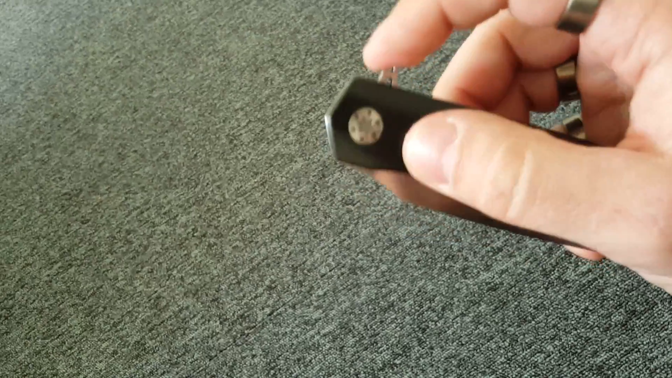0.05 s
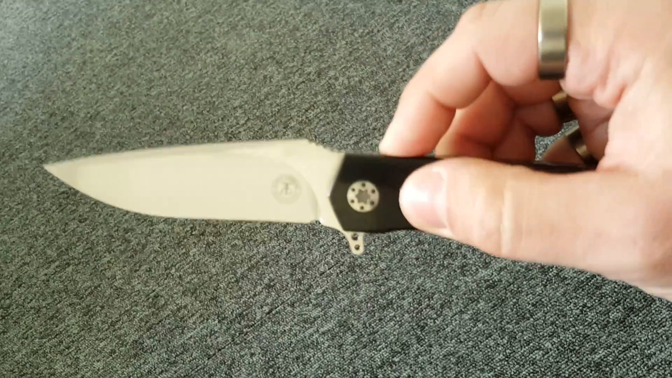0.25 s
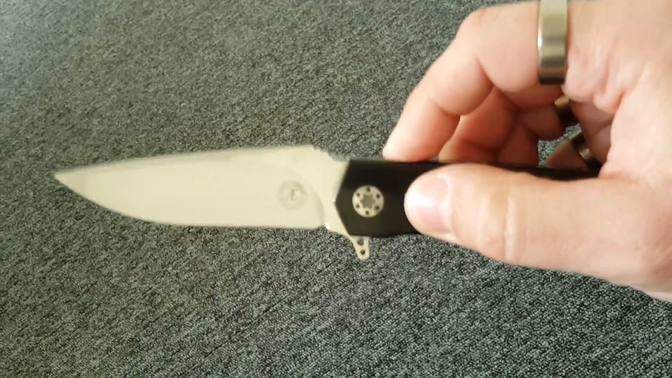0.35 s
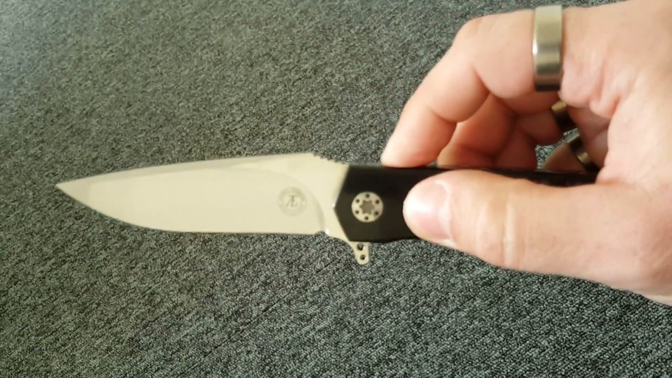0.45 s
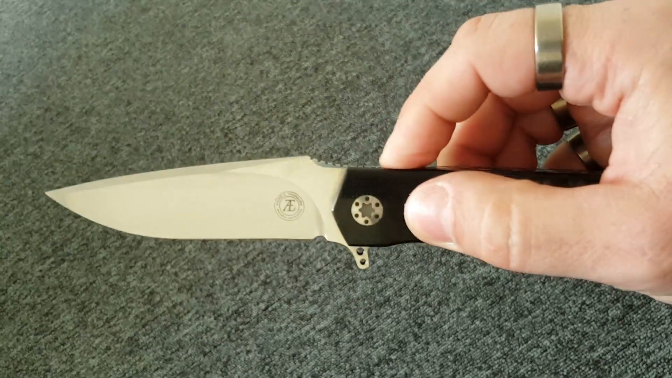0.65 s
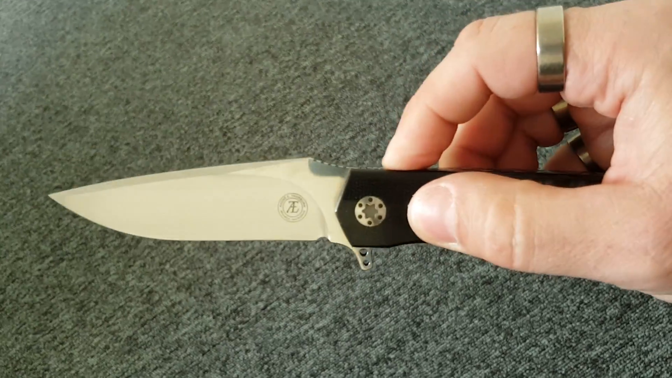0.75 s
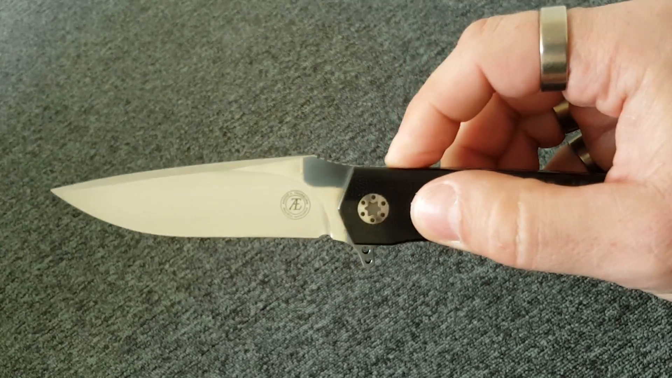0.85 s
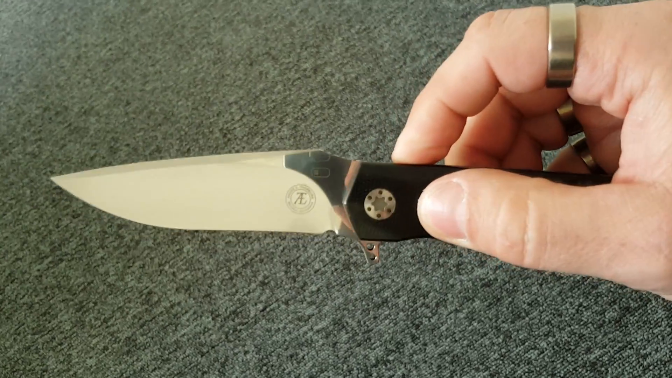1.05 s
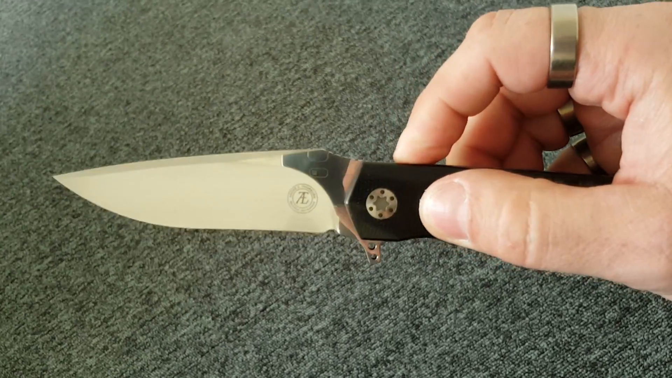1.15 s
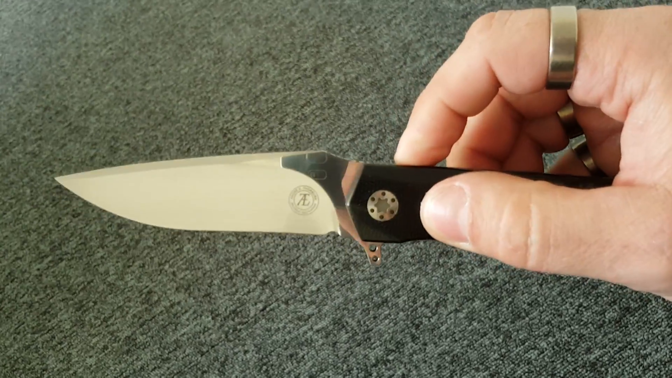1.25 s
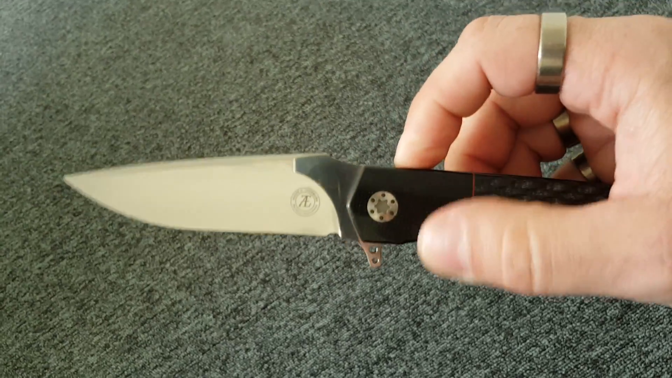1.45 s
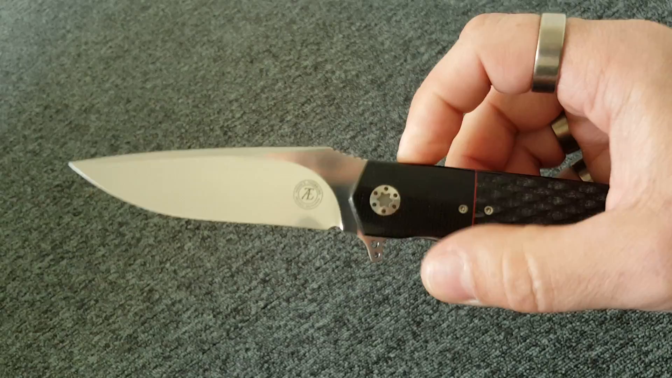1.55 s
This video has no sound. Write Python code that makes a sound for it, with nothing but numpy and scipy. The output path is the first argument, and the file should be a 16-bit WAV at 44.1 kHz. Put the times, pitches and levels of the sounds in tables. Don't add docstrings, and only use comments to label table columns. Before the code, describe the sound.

Close stereo sound of a pocket knife opening: a brief faint metal grate leads at once into a crisp, loud locking clack, quickly damped by the hand, then only soft low room hum and slight hiss.

```python
import sys
import numpy as np
from scipy import signal
from scipy.fft import rfft, irfft, next_fast_len
from scipy.io import wavfile

SR = 44100
rng = np.random.default_rng(int(sys.argv[2]) if len(sys.argv) > 2 else 0)


def wrap_up_sound(samples):
    columns = np.atleast_2d(samples).T
    tamed = np.clip(columns, -1, 1)
    steps = np.round(tamed * 32767).astype(np.int16)
    wavfile.write(sys.argv[1], SR, steps)


def convert_level_to_amplitude(level_db):
    exponent = np.asarray(level_db, float) / 20
    return 10 ** exponent


N = 70560


def snap():
    # start_s, level_db, tilt_db_per_octave
    contacts = [(.1338, -51, -1), (.1537, -45.5, -7), (.1567, -40, -2), (.2042, -16, -1), (.2067, -30, -5),
                (.2095, -34.5, 4.5), (.2111, -5, 5.5), (.2122, -6.5, 1.5), (.2134, -6, 0.5),
                (.2146, -14.5, -0.5), (1.394, -69.5, 0), (1.461, -61.5, -3.0)]
    # pitch_hz, level_db, t60_s, left_right_db
    handle_modes = [(650, -30, 0.011, 11), (1113, -31, 0.057, 3.5), (1840, -18.5, 0.0073, -4.5),
                    (2740, -10, 0.0072, 7.2), (3255, 2.5, 0.013, 0.8), (3680, -2.5, 0.015, 4.45),
                    (4072, -5, 0.016, -4.5), (4760, 1.35, 0.013, -5), (5580, -6.5, .012, -1.4),
                    (6380, -17, 0.0086, 2.5), (9654, -16.5, 0.0095, 2), (11630, -26.5, 0.0041, 4.4),
                    (13034, -22.5, 0.015, 6.8), (15630, -22.5, .01, -8.5)]
    # pitch_hz, level_db, t60_s, left_right_db
    blade_modes = [(4605, -25, .12, 7.9), (6877, -16, 0.049, -1), (8470, -24, .15, -2.5),
                   (12346, -36, .08, -1)]
    spread_db = 5.5
    start_s, level_db, tilt_db = np.transpose(contacts)
    at = (start_s * SR).astype(int)
    part = start_s * SR % 1

    def strike(hz):
        chance_db = spread_db * rng.standard_normal(len(at))
        size = convert_level_to_amplitude(level_db + tilt_db * np.log2(hz / 4000) + chance_db)
        clicks = np.zeros(N)
        clicks[at], clicks[at + 1] = size * (1 - part), size * part
        return clicks

    return body(handle_modes + blade_modes, strike)


def slide():
    # time_s, level_db
    pressure = [
        (.118, -90),
        (.13, -68),
        (.15, -59.5),
        (.158, -53.5),
        (.165, -63.5),
        (.18, -62),
        (.19, -63),
        (.2, -59),
        (.206, -94.5),
    ]
    # pitch_hz, level_db, t60_s, left_right_db
    pivot_modes = [(1980, -8.5, 0.0024, 3.7), (3500, -11, 0.01731, -6), (4135, -0.2, 0.0081, -1.2),
                   (4980, -10.5, .02, 1.1), (6600, -22, 0.013, -0.4), (8450, -22.5, .015, 5.55),
                   (10024, -21.5, 0.004, -2.4), (12600, -17, .03, 1.6), (13700, -12, .015, 2.4)]
    grains_per_s, grain_db = 3000, 2.5
    sizes = convert_level_to_amplitude(grain_db * np.minimum(rng.exponential(1, N), 4)) * rng.choice([-1, 1], N)
    grains = rms_one(sizes * (rng.random(N) < grains_per_s / SR))
    friction = grains * convert_level_to_amplitude(in_time(pressure))
    return body(pivot_modes, lambda hz: friction)


def body(modes, strike):
    total = 0
    for k, (hz, level_db, t60, left_right_db) in enumerate(modes):
        sides = convert_level_to_amplitude(level_db + left_right_db / 2 * np.array([[1], [-1]]))
        total = total + ring(strike(hz), hz, t60) * sides * (-1) ** k
    return total


def ring(clicks, hz, t60):
    r, w = convert_level_to_amplitude(-60 / (t60 * SR)), 2 * np.pi * hz / SR
    return signal.lfilter([0, np.sin(w)], [1, -2 * r * np.cos(w), r * r], clicks + 1e-18)


def rms_one(x):
    return x / np.sqrt(np.mean(x ** 2) + 1e-20)


def in_time(rows):
    return np.interp(np.arange(N) / SR, *np.transpose(rows))


def at_hz(points, hz):
    point_hz, value = np.array(points)[:, 0], np.array(points)[:, 1]
    return np.interp(np.log(hz), np.log(point_hz), value)


def room(x):
    # pitch_hz, t60_s
    early_t60 = [(500, 0.04), (2000, 0.66), (5000, 0.47), (15000, 0.37)]
    # pitch_hz, t60_s
    late_t60 = [(500, .3), (2000, 0.33), (5000, 0.76), (9000, .35), (15000, 0.16)]
    # pitch_hz, level_db
    wall_return = [(500, -5), (1200, -2), (2200, 3.1), (3300, -6.2), (4700, -1.3), (6000, -3.8),
                   (9000, 2.75), (15000, 1.6)]
    room_db, late_db, first_wall_s, build_s = -41.5, -15.5, 0.0029, 0.0033
    t = np.arange(SR) / SR
    build = 1 - np.exp(-np.maximum(t - first_wall_s, 0) / build_s)
    echo = 0
    for hz, noise in bands(150, SR):
        early = convert_level_to_amplitude(-60 * t / at_hz(early_t60, hz))
        late = convert_level_to_amplitude(late_db - 60 * t / at_hz(late_t60, hz))
        echo = echo + noise * convert_level_to_amplitude(at_hz(wall_return, hz)) * (early + late)
    return convert_level_to_amplitude(room_db) * signal.fftconvolve(build * echo, x[:1], axes=1)[:, :N]


def bands(low_hz, length):
    edges = low_hz * 2 ** np.arange(0, np.log2(17000 / low_hz), 1 / 3)
    settle = 8000
    white = rng.standard_normal((2, 2, length + settle))
    for k, (low, high) in enumerate(zip(edges, edges[1:])):
        sos = signal.butter(2, [low, high], "band", fs=SR, output="sos")
        yield np.sqrt(low * high), signal.sosfilt(sos, white[k % 2])[:, settle:]


def hum():
    # pitch_hz, level_db, width_hz, steady_share
    lines = [(65.4, -52.5, 33, .1), (181.7, -50, 6.7, 0.49), (292.6, -56, 4, 1), (650, -64, 60, 0.059)]
    out = 0
    for hz, level_db, width_hz, steady in lines:
        steady = np.clip(steady, 0, 1)
        narrow = ring(rng.standard_normal((2, N + 9000)), hz, 2.2 / width_hz)[:, 9000:]
        sine = np.sqrt(2) * np.sin(2 * np.pi * (hz * np.arange(N) / SR + rng.random()))
        line = np.sqrt(steady) * sine + np.sqrt(1 - steady) * rms_one(pair(narrow, hz))
        out = out + convert_level_to_amplitude(level_db) * line
    return out


def room_noise():
    # pitch_hz, density_db_per_hz
    air_spectrum = [(15, -41), (25, -7), (64, -6), (149, -8), (182, -12), (300, -10), (325, -17.5),
                    (642, -21.5), (3000, -40.5), (3900, -74.5), (6600, -120)]
    return convert_level_to_amplitude(-50) * bed(air_spectrum, patchy_db=2.12, steep_db=14.0)


def recorder_hiss():
    # pitch_hz, density_db_per_hz
    hiss_spectrum = [(1180, -31.5), (2000, -0.5), (3860, -2), (5940, -7.5), (11200, -9), (15000, -9),
                     (15800, -15)]
    return convert_level_to_amplitude(-75.5) * bed(hiss_spectrum, patchy_db=0.2, steep_db=16.5)


def bed(spectrum, patchy_db, steep_db):
    low, high = spectrum[0][0], spectrum[-1][0]
    total = 0
    for hz, noise in bands(18, N):
        octaves_outside = max(0, np.log2(low / hz), np.log2(hz / high))
        level_db = at_hz(spectrum, hz) - steep_db * octaves_outside + patchy_db * drift(2.4)
        total = total + convert_level_to_amplitude(level_db) * pair(noise, hz)
    return rms_one(total)


def drift(rate):
    r = np.exp(-80 * np.pi * rate / SR)
    slow = signal.lfilter([1], [1, -2 * r, r * r], rng.standard_normal(N // 40 + 2002))[2000:]
    return np.interp(np.arange(N) / 40, np.arange(len(slow)), rms_one(slow))


def pair(noise, hz):
    # pitch_hz, left_right_likeness
    likeness = [(60, 0.92), (180, 0.98), (550, -0.12), (1650, 0.45), (4970, 0.47), (15000, -0.02)]
    alike = np.clip(at_hz(likeness, hz), 0, 1)
    return np.sqrt(1 + alike) * noise[0] + np.sqrt(1 - alike) * noise[1] * [[1], [-1]]


def delayed(x, lag_s):
    size = next_fast_len(N + 64)
    turn = np.exp(-2j * np.pi * np.fft.rfftfreq(size, 1 / SR) * lag_s)
    return irfft(rfft(x, size) * turn, size)[:N]


def scene():
    knife = snap() + slide()
    direct = np.array([knife[0], delayed(knife[1], lag_s=.00011)])
    background = room_noise() + hum() + recorder_hiss()
    background_pan_db = -0.2
    sides = convert_level_to_amplitude(background_pan_db / 2 * np.array([[1], [-1]]))
    return direct + room(knife) + background * sides


def band_limit(x):
    return signal.sosfilt(signal.butter(12, 15940, fs=SR, output="sos"), x)


def record(dry):
    # time_s, gain_db
    gain = [
        (0, -2),
        (.21, -0.04),
        (.3, -7),
        (.42, -8),
        (.7, -7.5),
        (.95, -5),
        (1.15, -1.5),
        (1.35, -1.6),
        (1.6, -0.9),
    ]
    finished = np.clip(dry * convert_level_to_amplitude(in_time(gain)), -1, 1)
    return band_limit(finished)


dry = scene()
out = record(dry)
wrap_up_sound(out)
```